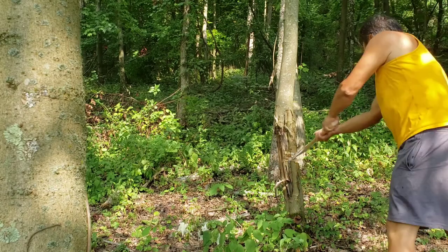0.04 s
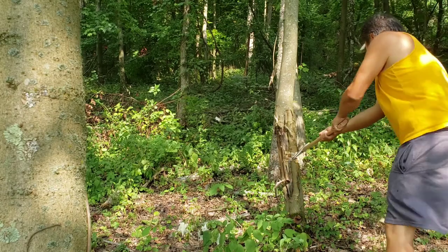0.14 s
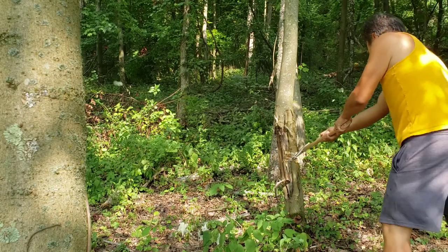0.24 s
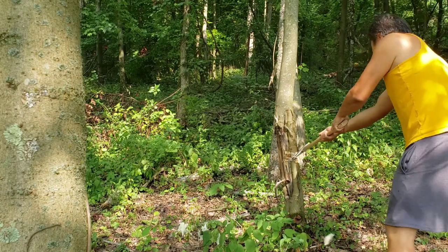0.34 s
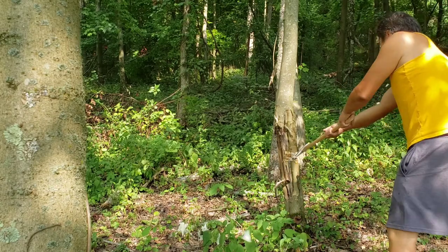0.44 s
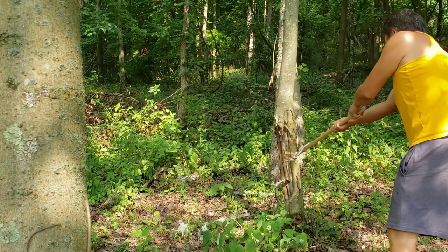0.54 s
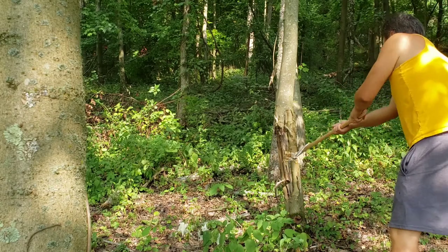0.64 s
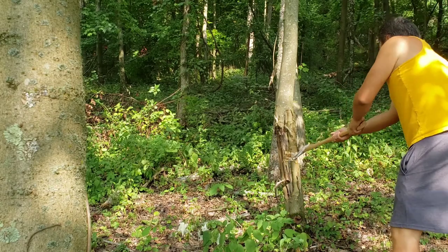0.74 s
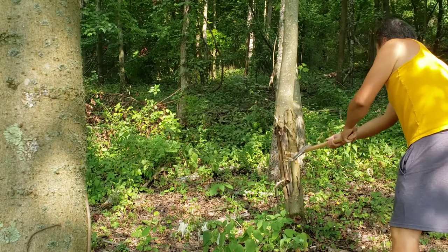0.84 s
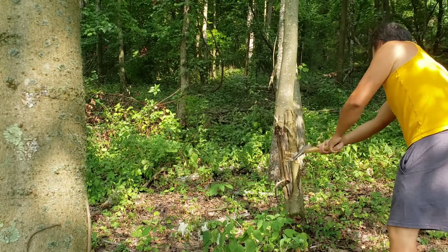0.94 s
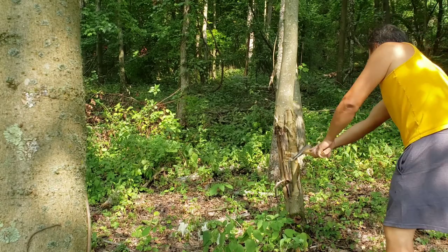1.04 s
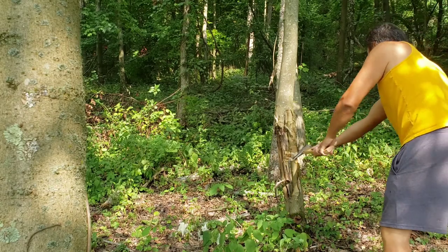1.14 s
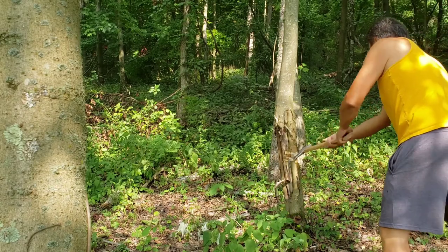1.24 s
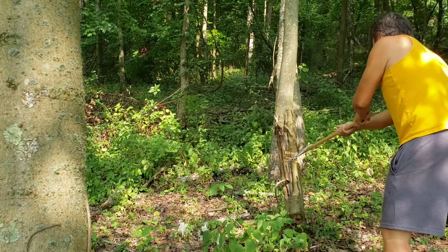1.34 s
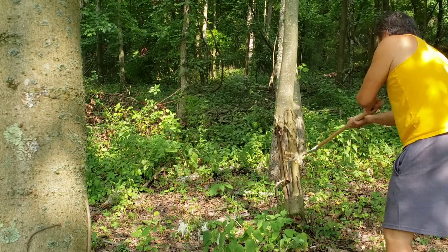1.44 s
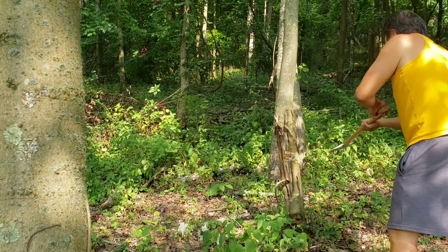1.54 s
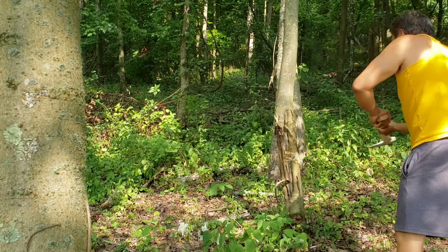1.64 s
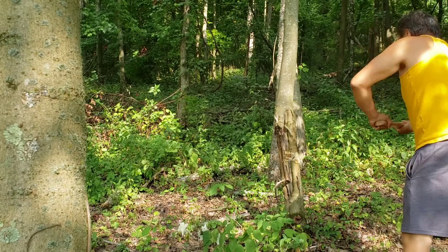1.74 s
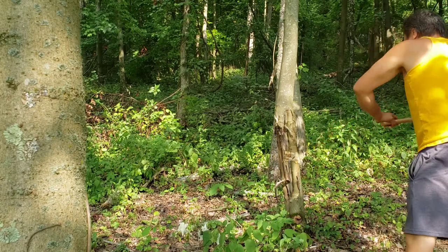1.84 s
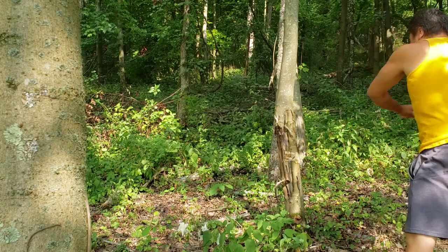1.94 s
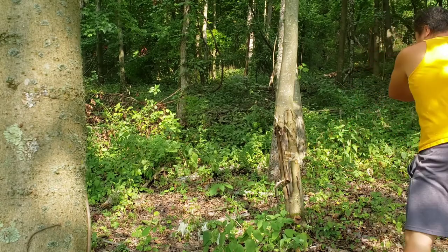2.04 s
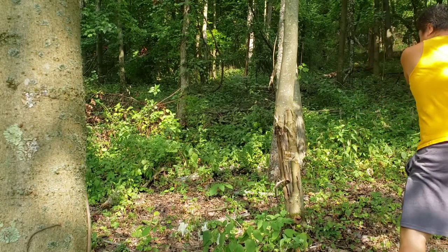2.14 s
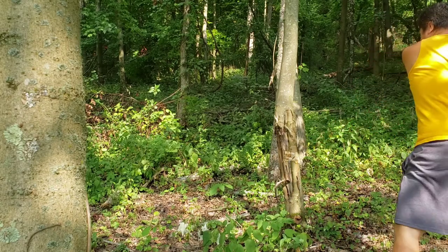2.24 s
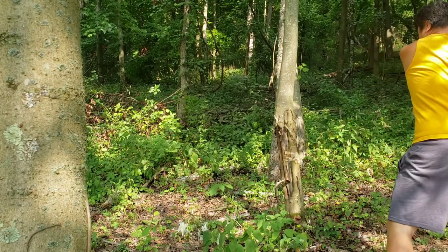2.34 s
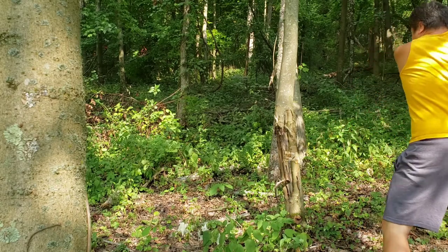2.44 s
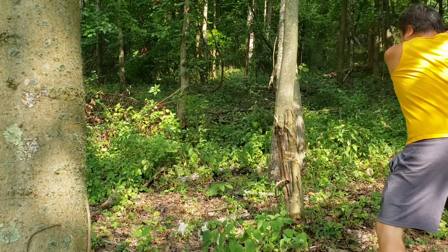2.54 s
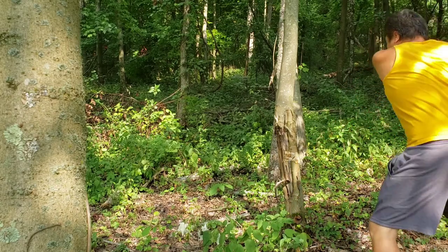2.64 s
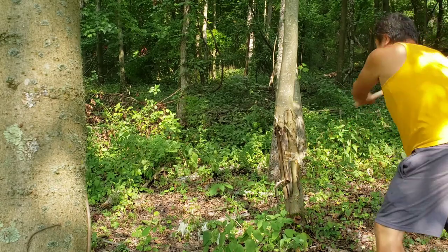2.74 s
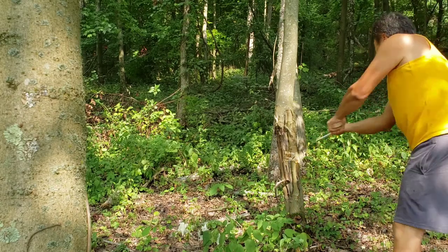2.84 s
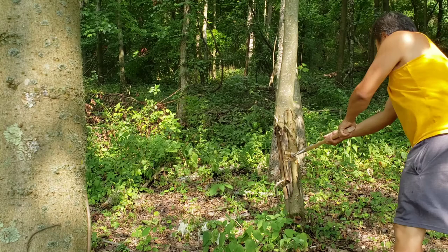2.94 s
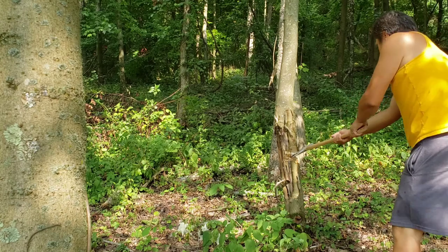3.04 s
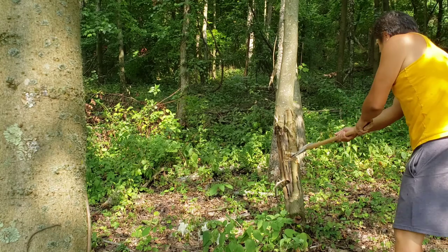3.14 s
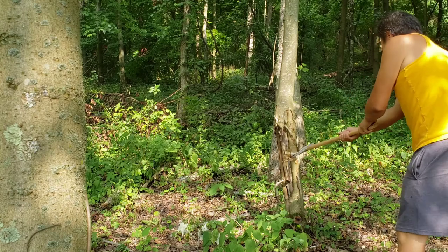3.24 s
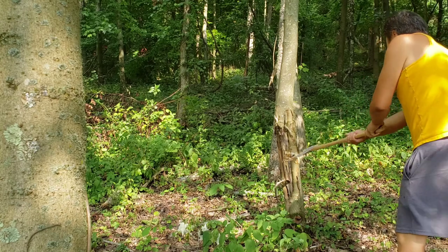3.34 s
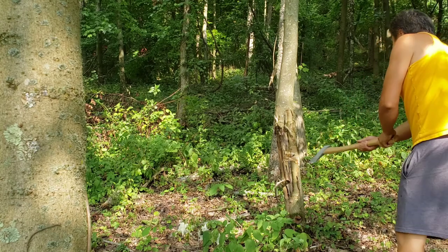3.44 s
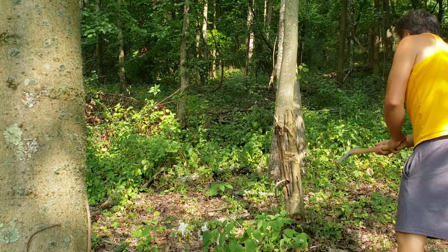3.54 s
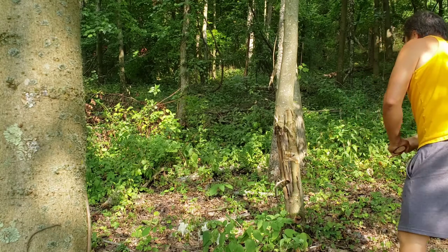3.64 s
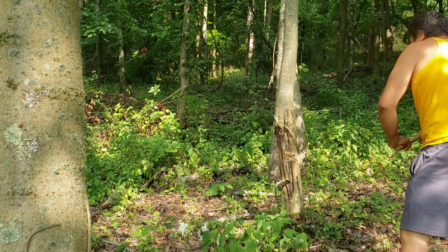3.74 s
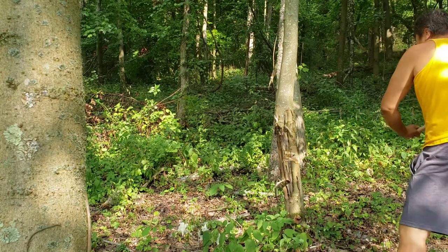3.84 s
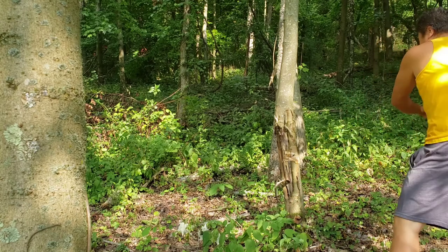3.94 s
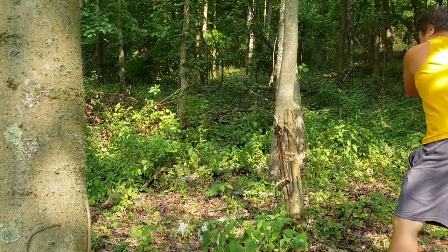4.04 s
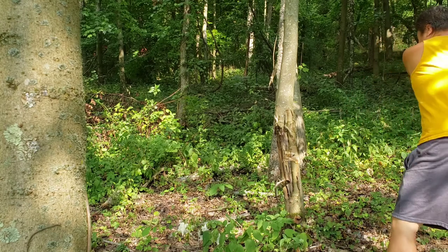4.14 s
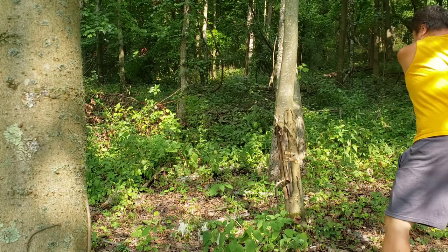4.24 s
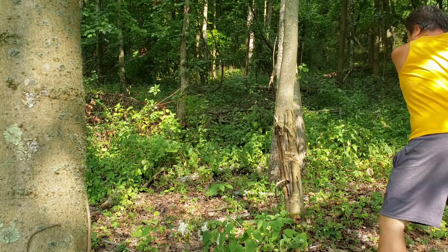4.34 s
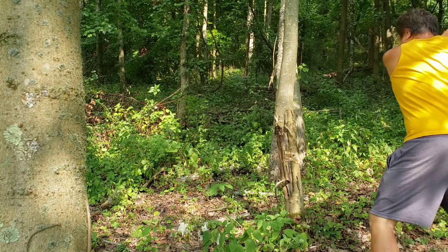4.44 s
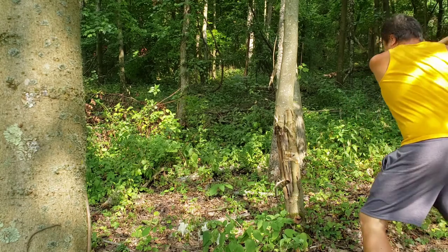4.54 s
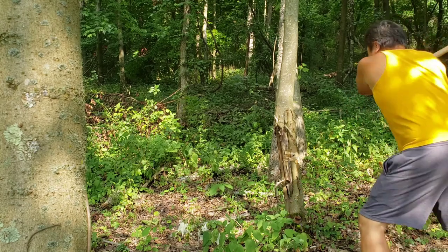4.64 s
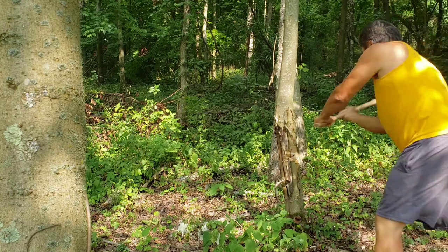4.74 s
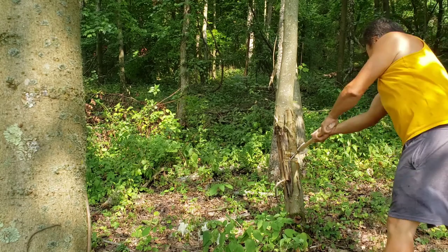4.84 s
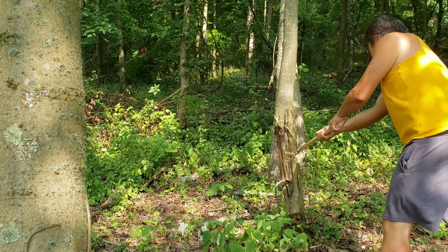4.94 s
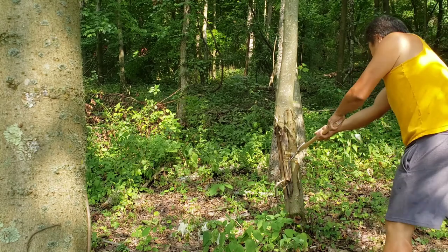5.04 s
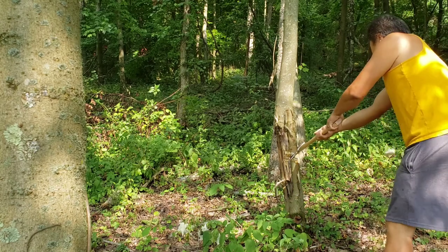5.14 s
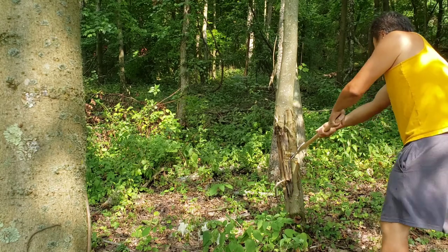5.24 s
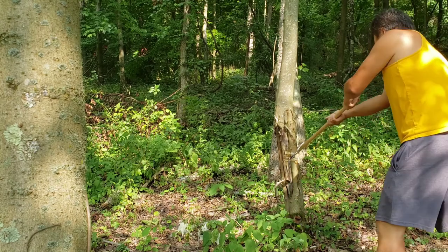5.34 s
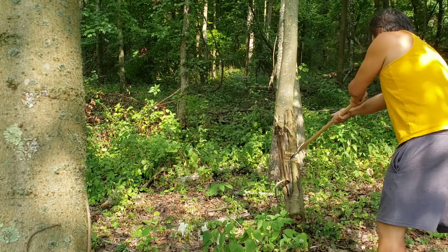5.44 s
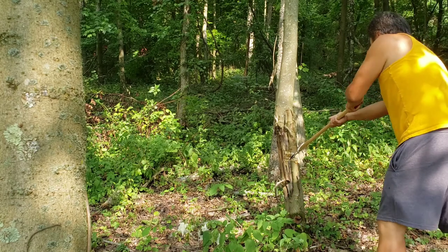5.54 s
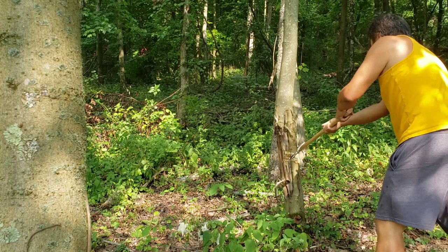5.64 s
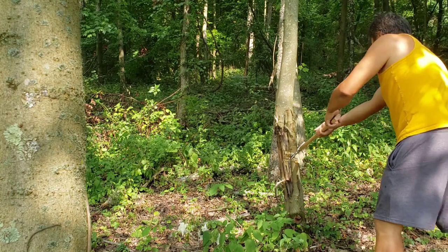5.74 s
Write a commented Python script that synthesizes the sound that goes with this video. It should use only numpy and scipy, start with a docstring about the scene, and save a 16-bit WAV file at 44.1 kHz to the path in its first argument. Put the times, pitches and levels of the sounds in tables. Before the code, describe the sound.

Three sharp, thudding axe strikes on a tree trunk echo briefly through a still forest, with small wood snaps in between.

```python
"""An axe bites three times into a slim standing tree, a few steps from a stereo microphone in a quiet wood.
Each chop is a crack of fibres and a falling thud of bending waves in the trunk, scattered back by the
trees around. Leaves stir as the swing begins and chips patter down after it. Between the chops
splinters snap, feet shift and the stuck blade rubs in the cut, over a low rumble of air."""
import sys
import numpy as np
from scipy import signal
from scipy.fft import rfft, irfft
from scipy.io import wavfile
from scipy.ndimage import uniform_filter1d

SR = 44100
rng = np.random.default_rng(int(sys.argv[2]) if len(sys.argv) > 2 else 0)


def store_pcm(level_fs):
    """Save levels as 16-bit WAV."""
    pcm = np.round(np.clip(level_fs, -1, 1) * 32767).astype(np.int16)
    wavfile.write(sys.argv[1], SR, np.atleast_2d(pcm).T)


N = 254898
T = np.arange(SR) / SR - .02  # one second around a blow, which lands at T = 0
AGE = np.maximum(T, 0)  # seconds since the blow


def amp(db):
    return 10 ** (np.asarray(db) / 20)


def unit_rms(x):
    return x / np.sqrt(np.mean(x ** 2) + 1e-20)


def curve(points, hz):
    """Reads (Hz, value) points along a log-frequency axis."""
    f, value = np.transpose(points)
    return np.interp(np.log(hz + 1), np.log(f + 1), value)


def freqs(x):
    return np.fft.rfftfreq(x.shape[-1], 1 / SR)


def filtered(x, gain):
    return irfft(rfft(x) * gain, x.shape[-1])


def noise(spectrum, shape):
    """Noise of rms 1 with a spectrum of (Hz, dB) points."""
    white = rng.standard_normal(shape)
    return unit_rms(filtered(white, amp(curve(spectrum, freqs(white)))))


def panned(db):
    """Gains that put the left channel db above the right."""
    return amp([[db / 2], [-db / 2]])


def add(mix, start_s, sound):
    at = round(start_s * SR)
    part = mix[:, max(at, 0):at + sound.shape[-1]]
    part += sound[..., max(-at, 0):][..., :part.shape[-1]]


def burst(rise_s, fall_s):
    """Envelope that peaks at T = 0."""
    return np.exp(-np.maximum(-T / rise_s, T / fall_s))


def swell(length_s):
    """Envelope that grows fast from the first sample and dies away."""
    progress = (T - T[0]) / (length_s / 4)
    return progress * np.exp(1 - progress)


def bell(hz, width):
    """A broad resonance on a log-frequency axis, for sounds as long as T."""
    return 1 / (1 + (np.log((freqs(T) + 1) / hz) / width) ** 2)


def grains(per_s, size_db):
    """A stereo swarm of clicks, a few much larger than the rest."""
    shape = (2, len(T))
    sizes = rng.standard_normal(shape) * amp(size_db * np.minimum(rng.exponential(1, shape), 4))
    return unit_rms(sizes * (rng.random(shape) < per_s / SR))


# Sound from all sides at the microphone. Each row: frequency in Hz, left-right likeness from 0 to 1.
COHERENCE = [(130, .95), (290, 0.83), (640, 0.03), (1400, 0)]
def diffuse(pair):
    """Diffuse sound is alike at both microphone ports in the bass and unrelated in the treble."""
    alike = np.clip(curve(COHERENCE, freqs(pair)), 0, 1)
    right = filtered(pair[0], alike) + filtered(pair[1], np.sqrt(1 - alike ** 2))
    return np.array([pair[0], right])


# Still air among the trees. Each row: frequency in Hz, relative level in dB.
AIR_SPECTRUM = [(12, -39), (20, -16), (44, -8.5), (70, -2), (123, -12.5), (146, -17.5), (234, -25.5),
                (422, -36.5), (485, -34), (698, -35.5), (1810, -44.5), (2750, -45), (6540, -53.5),
                (14700, -39.5), (16000, -54)]
# The rise and fall of the rumble. Each row: time in seconds, relative level in dB before scaling.
RUMBLE_CONTOUR = [(0.7, -62.2), (1.02, -56.5), (1.38, -67.0), (1.7, -58.7), (1.95, -62.2), (2.45, -57.0),
                  (3.7, -64.3), (3.95, -63.0), (5.7, -64.4)]
def air(level_db=-62.2, rumble_follow=.75, hiss_follow=.22, left_db=4):
    """All around the microphone a low rumble swells and sinks, and a faint hiss follows it a little."""
    bed = diffuse(noise(AIR_SPECTRUM, (2, N)))
    low = filtered(bed, curve([(250, 1), (900, .076)], freqs(bed)))
    times, db = np.transpose(RUMBLE_CONTOUR)
    swell_db = np.interp(np.arange(N) / SR, times, db - np.mean(db))
    hiss = (bed - low) * amp(hiss_follow * swell_db)
    rumble = low * amp(rumble_follow * swell_db) * panned(left_db)
    return amp(level_db) * (hiss + rumble)


# Far echoes of the bite's pitch and of a second pitch. Each holds: delay in seconds, spread in seconds,
# level in dB, dB gained per dB of dullness, share of the chop's echo width.
BITE_ECHO = (.16, .175, -61, -.6, 1)
SECOND_ECHO = (.185, .115, -68, .4, .58)
def far_trees(patchy_db=1.5):
    """The strongest pitches of a blow carry far and come back in a lumpy swell from distant trees."""
    out = np.zeros((2, N))
    for start, dull_db, _, bite_hz, *_, second_hz, width_hz in AXE_BLOWS:
        for hz, (delay, spread, db, per_dull, share) in (bite_hz, BITE_ECHO), (second_hz, SECOND_ECHO):
            arriving = np.exp(-.5 * ((AGE - delay) / spread) ** 2) * (1 - np.exp(-AGE / .02))
            lumps = noise([(5, 0), (30, -5.5), (120, -50.5), (1000, -89)], len(T))
            resonance = bell(hz, share * width_hz / hz) ** 2
            band = unit_rms(filtered(rng.standard_normal((2, len(T))), resonance))
            add(out, start + T[0], amp(db + per_dull * dull_db + patchy_db * lumps) * arriving * band)
    return out


# The surrounding wood's answer to a blow. Each row: band centre in Hz, relative level in dB,
# seconds for the tail to fall 60 dB, near wash over the tail in dB.
FOREST_BANDS = [(25, -14.5, .3, 0), (69.82, 16.5, 0.12, 0), (170, 14.5, 0.31, -0.5), (320, 0, 0.5, 1.5),
                (646, -0.5, 0.57, 0.5), (1114.7, -0.5, .52, -4), (1900, 0, .55, 1), (3200, -0.5, .55, 0.5),
                (4930, -5, .52, 3), (7700, -14.5, 0.61, 2), (9256, -1, .54, 0.5), (12350, -1.5, 0.61, 1.5),
                (16700, -12, 0.73, 2)]
def forest(treble_db, level_db=-29, near_t60=.22, patchy_db=.94, ripple_db=2.5):
    """Leaves and trunks scatter the blow: a quick near wash, then a lumpy tail, band by band."""
    scatter = diffuse(grains(per_s=12000, size_db=2.5))
    hz = freqs(T)
    centres, dbs, t60s, near_dbs = np.transpose(FOREST_BANDS)
    ripple = uniform_filter1d(rng.standard_normal(len(hz)), size=110)  # each blow has its own colour
    ripple = unit_rms(uniform_filter1d(ripple, size=90))
    colour = unit_rms(amp(curve(np.c_[centres, dbs], hz)))
    colour *= amp(treble_db * curve([(1500, .071), (10000, 1)], hz))
    colour *= amp(ripple_db * ripple * curve([(200, .072), (600, .94), (2500, .99), (6000, .25)], hz))
    echo = 0
    for share, t60, near_db in zip(np.eye(len(centres)), t60s, near_dbs):
        band = filtered(scatter, colour * curve(np.c_[centres, share], hz))
        echo += band * (amp(-60 * AGE / t60) + amp(near_db - 60 * AGE / near_t60))
    lumps = noise([(10, 0), (120, -1.5), (500, -51), (2000, -89.5)], (2, len(T)))
    onset = 1 - np.exp(-AGE / .0044)
    return echo * amp(level_db + patchy_db * lumps) * onset


# Dry leaves and splinters. Each row: frequency in Hz, relative level in dB.
LITTER_SPECTRUM = [(300, -37.5), (1000, -28), (3000, -26), (5500, -23), (7700, -28.5), (9300, 0),
                   (11500, 0.5), (16000, -5)]
def rustle(length_s):
    """A dry rustle: a swarm of tiny clicks that swells fast and dies away."""
    clicks = grains(per_s=4000, size_db=3.3)
    return swell(length_s) * unit_rms(filtered(clicks, amp(curve(LITTER_SPECTRUM, freqs(T)))))


def snap(level_db=-7, tail_db=-24):
    """A splinter breaks: a millisecond or so of bright noise, with a faint echo from the trees."""
    envelope = burst(.0003, .0017) + amp(tail_db) * burst(.001, .13)
    return amp(level_db) * noise(LITTER_SPECTRUM, (2, len(T))) * envelope


# Short dry crackles and rustles as the blade is worked loose and feet shift.
# Each row: start in seconds, length in seconds, level in dB, pan left in dB.
RUSTLES = [(0.786, .11, -63.5, 3), (0.92, .16, -67.5, 2), (1.39, .14, -72.5, -1.5), (1.812, .21, -66, -3.5),
           (3.295, 0.11, -58.5, -1), (3.742, 0.12, -70.5, -4), (4.071, 0.16, -73, -2),
           (5.453, 0.11, -62, -1)]
def rustles(swing_lead_s=.26, swing_db=-74.5, chips_delay_s=.36, chips_s=.33, chips_db=-69, tick_db=-59):
    """Dry crackles as the blade is worked loose, feet shift, each swing begins and the chips land."""
    out = np.zeros((2, N))
    for start, length, db, pan_db in RUSTLES:
        add(out, start, amp(db) * panned(pan_db) * rustle(length))
    for start, *_ in AXE_BLOWS:
        add(out, start - swing_lead_s, amp(swing_db) * rustle(length_s=.32))
        add(out, start + chips_delay_s, amp(chips_db) * rustle(chips_s))
        for late in rng.random(size=2):  # two chips land with a tick of their own
            add(out, start + T[0] + chips_delay_s + late * chips_s, amp(tick_db) * snap())
    return out


# The wood around the cut. Each row: resonance in Hz, relative width, relative level in dB.
CUT_RESONANCES = [(732, .2, 0), (1400, .3, -14), (2980, .1, -12), (4810, .25, -20)]
# Tugs on the stuck axe. Each row: start in seconds, level in dB.
TUGS = [(3.3, -73), (5.452, -72.5)]
def blade_rub(length_s=.09):
    """The stuck blade is levered in the cut: many small slips ring the wood around it."""
    out = np.zeros((2, N))
    wood = sum(amp(db) * bell(hz, width) for hz, width, db in CUT_RESONANCES)
    for start, db in TUGS:
        slips = grains(per_s=1500, size_db=2.5)
        add(out, start, amp(db) * swell(length_s) * unit_rms(filtered(slips, wood)))
    return out


# The loudest splinters. Each row: time in seconds, gain in dB, pan left in dB.
SPLINTERS = [(0.485, -49, 0), (0.8305, -32, 5), (0.9236, -46.5, 13), (1.8185, -49, -7), (1.9005, -48, 2),
             (3.303, -50, -2), (3.578, -53, 8), (5.2833, -49.5, 2)]
# A dull knock as the axe meets the trunk again, then small twig ticks.
# Each row: time in seconds, level in dB, decay in seconds, centre in Hz, pan left in dB.
WOOD_KNOCKS = [(0.1752, -36.5, 0.0026, 580, 4.5), (1.664, -69, 0.00091, 4500, -1),
               (2.682, -65.5, 0.00086, 5500, 4.5), (2.7048, -55, 0.00091, 1250, 0.5)]
def snaps_and_knocks(knock_tail_db=-21):
    """Splinters snap, the axe knocks the trunk and twigs tick, each with a faint echo from the trees."""
    out = np.zeros((2, N))
    for start, db, pan_db in SPLINTERS:
        add(out, start + T[0], amp(db) * panned(pan_db) * snap())
    for start, db, decay, hz, pan_db in WOOD_KNOCKS:
        grit = unit_rms(filtered(rng.standard_normal((3, len(T))), bell(hz, width=.8)))
        knock = grit[0] * burst(.00025, decay)
        echo = amp(knock_tail_db) * burst(.001, .078) * grit[1:]
        add(out, start + T[0], amp(db) * panned(pan_db) * (knock + echo))
    return out


# Modes of the notched trunk. Each row: frequency in Hz, relative level in dB, seconds to fall 60 dB.
TRUNK_MODES = [(65.5, -9.5, 0.38), (79, 1, 0.15), (110.6, -2, 0.22), (174, -9, 0.3), (213.3, -8.5, .2),
               (266, -8.5, .1), (465, -1, 0.094), (581, -21, 0.22), (675, -5, .085), (806, -7, 0.095),
               (925, -12.5, .09), (1047, -14.5, .09), (1195, -13, .08), (1295, -18.5, 0.14),
               (1608, -17, 0.047), (1824, -19.5, 0.21), (2425, -18.5, .08)]
# The first bending wave. Each row: frequency in Hz, relative level in dB.
THUD_SPECTRUM = [(20, -44), (40, -17.5), (60, -5), (90, 1), (140, -12.5), (260, -14), (500, -20.5),
                 (1000, -25), (2000, -24.5), (5000, -54)]
def trunk(lag_s, thud_hz, body_db, body_hz, modes_db, wave_db=36):
    """Bending waves travel as the root of frequency: the treble arrives first, so the thud sweeps down."""
    hz = freqs(T)
    spectrum_db = curve(THUD_SPECTRUM, hz)
    wave = irfft(amp(spectrum_db + wave_db) * np.exp(2j * np.pi * hz * T[0]), len(T))
    modes = sum(amp(db - 60 * AGE / t60) * np.cos(2 * np.pi * f * AGE) for f, db, t60 in TRUNK_MODES)
    # a slim trunk moves little air in the deep bass
    radiated = amp(curve([(15, -41), (35, -14), (60, -1.5), (2500, -1.5), (5000, -32)], hz))
    ring = amp(modes_db) * filtered((T > 0) * modes, radiated)
    stop_db = curve(THUD_SPECTRUM, hz * 86 / thud_hz) - spectrum_db  # a quicker stop thuds higher
    place_db = body_db * bell(body_hz, width=.18)  # the place of the cut favours some modes
    dispersion = np.exp(-4j * np.pi * lag_s * np.sqrt(100 * hz) + 2j * np.pi * hz * .003)
    fade = np.interp(T, [-.005, -.002, .5, .9], [0, 1, 1, 0])
    return filtered(wave + ring, amp(stop_db + place_db) * dispersion) * fade


def bite(hz, decay_s, sag_s=.025):
    """The blade wedges in: a few rough cycles whose pitch sags as it slows."""
    cycles = hz * sag_s * (1 - np.exp(-T / sag_s))
    grit = noise([(hz / 5, -30), (hz * .6, -4), (hz, 0), (hz * 1.5, -10), (hz * 5, -45)], len(T))
    return (np.sin(2 * np.pi * cycles) + grit) * burst(.0009, decay_s)


# Fibres parting under the edge. Each row: frequency in Hz, relative level in dB.
FIBRE_SPECTRUM = [(200, -10.5), (1000, -2.5), (2500, 0.5), (4300, -5.5), (6500, -6.5), (7700, -16.5),
                  (9000, -3), (10500, 6), (13000, -0.5), (16000, -6.5)]
def crack(decay_s, splinter_db=-22, splinter_s=.015, stereo_width=.9):
    """Fibres crush for a few milliseconds, part in one sharp burst, then go on splintering."""
    grit = noise(FIBRE_SPECTRUM, (3, len(T)))
    touch = np.interp(T, [-.008, -.002], [0, 1]) ** 2
    envelope = burst(.0026, decay_s) + amp(splinter_db) * burst(.0015, splinter_s)
    return unit_rms(grit[0] + stereo_width * grit[1:]) * touch * envelope


# Echoes off the ground and the nearest trunk. Each row: delay in seconds, gain in dB, pan left in dB.
NEAR_REFLECTIONS = [(.004, -16, 0), (.017, -16, 3)]
# The axe, a few steps from the microphone. Each row: time in seconds, dullness of the cut in dB,
# bite level in dB, bite pitch in Hz, bite decay in seconds, thud gain in dB, thud pitch in Hz,
# woody body boost in dB, body pitch in Hz, trunk mode gain in dB, forest echo gain in dB,
# second pitch of the far echo in Hz, width of the far echo in Hz.
AXE_BLOWS = [(0.0499, 0, -14, 2400, 0.0013, -6.5, 71.9, 5, 373, -16.5, -1, 1760, 520),
             (2.9001, 3, -15.5, 1720, 0.0015, -5.2, 84, 2.5, 910, -14.5, 1.5, 950, 310),
             (4.8418, 9, -18, 1100, 0.0078, -6, 94, 4, 190.3, -12.5, 1, 3130, 500)]
def chops(crack_db=-9.5, left_lag_s=.00011):
    """Each blow reaches the right port first; ground and trunks, then the whole wood, answer it."""
    out = np.zeros((2, N))
    port_delay = np.exp(-2j * np.pi * freqs(T) * np.array([[left_lag_s], [0]]))
    for (start, dull_db, bite_db, bite_hz, bite_s, thud_db, thud_hz,
         body_db, body_hz, modes_db, echo_db, *_) in AXE_BLOWS:
        # a dull cut weakens the crack, draws out crack and thud, and darkens the echo
        fibres = amp(crack_db - dull_db) * crack(decay_s=.0008 + .00011 * dull_db)
        cut = fibres + amp(bite_db) * bite(bite_hz, bite_s)
        thud = amp(thud_db) * trunk(.016 + .00033 * dull_db, thud_hz, body_db, body_hz, modes_db)
        echo = amp(echo_db) * forest(treble_db=-.73 * dull_db)
        add(out, start + T[0], filtered(cut + thud, port_delay) + echo)
        for delay, db, pan_db in NEAR_REFLECTIONS:
            add(out, start + T[0] + delay, amp(db) * panned(pan_db) * cut)
    return out


def scene():
    return chops() + far_trees() + snaps_and_knocks() + rustles() + blade_rub() + air()


# The microphone's two ports. Each row: frequency in Hz, left over right in dB.
PORT_BALANCE = [(100, 4.5), (600, 2.5), (2000, 4.5), (5000, 2), (10000, 0.24)]
def record(dry, ceiling=.85, cutoff_hz=16150):
    """The microphone hears more on the left, rounds off the tallest peaks and cuts the top treble."""
    heard = filtered(dry, amp(np.outer([.5, -.5], curve(PORT_BALANCE, freqs(dry)))))
    rounded = heard / (1 + (heard / ceiling) ** 6) ** (1 / 6)
    lowpass = signal.firwin(511, cutoff_hz, window=("kaiser", 9), fs=SR)
    return signal.oaconvolve(rounded, lowpass[None], "same")


dry = scene()
out = record(dry)
store_pcm(out)
```